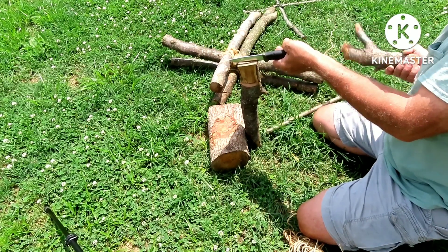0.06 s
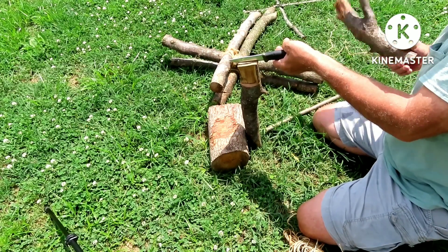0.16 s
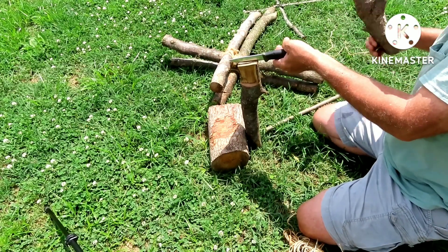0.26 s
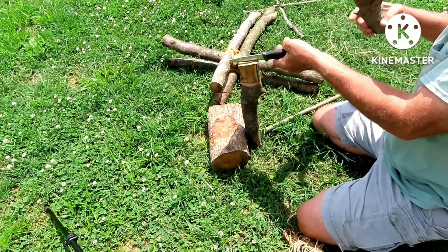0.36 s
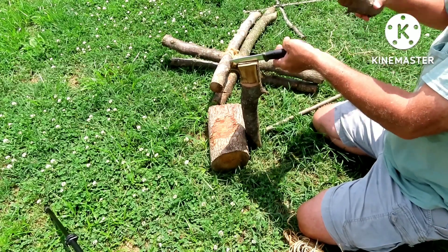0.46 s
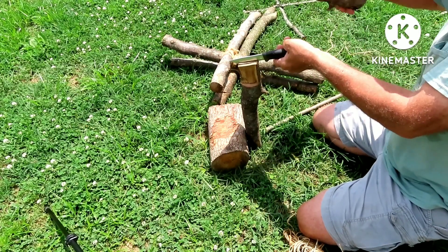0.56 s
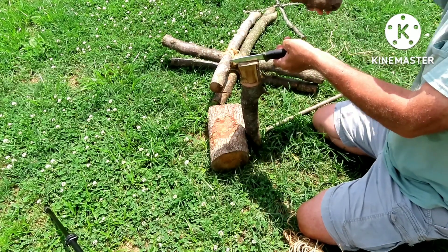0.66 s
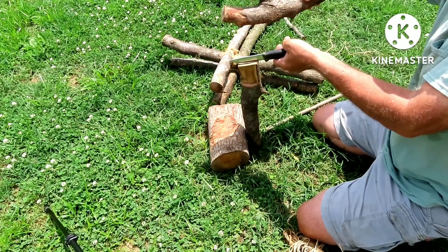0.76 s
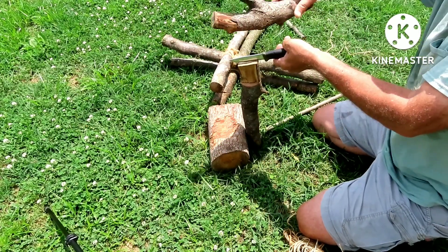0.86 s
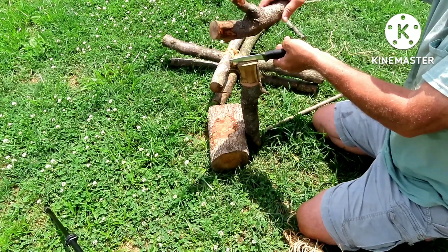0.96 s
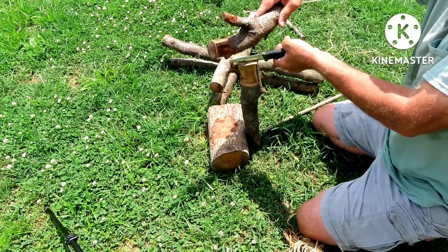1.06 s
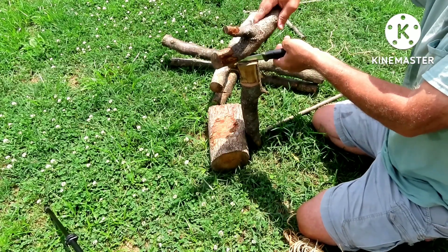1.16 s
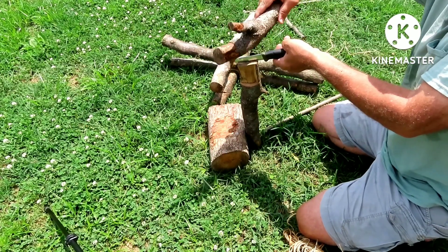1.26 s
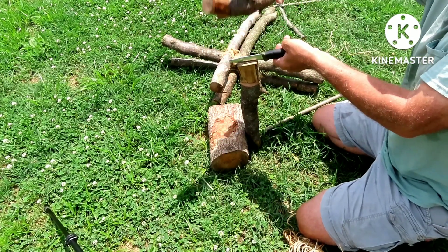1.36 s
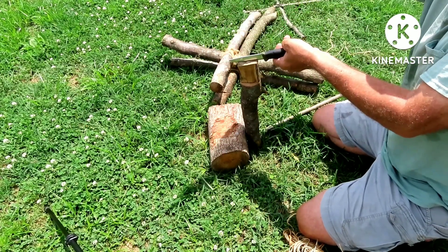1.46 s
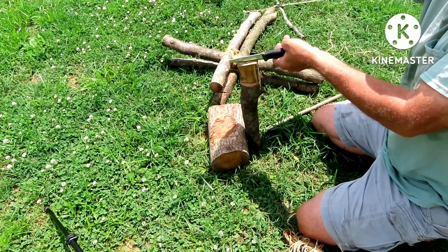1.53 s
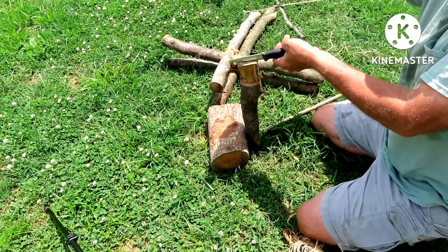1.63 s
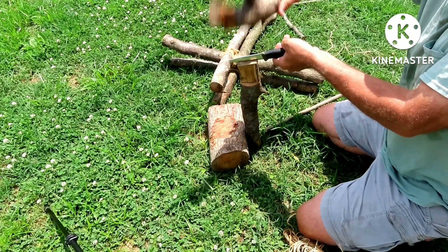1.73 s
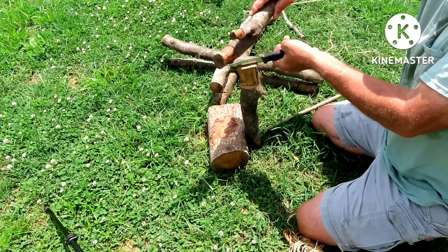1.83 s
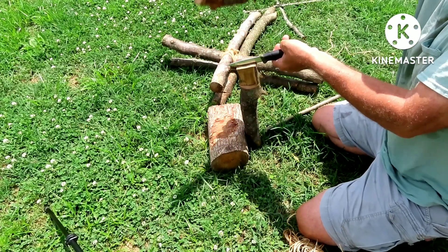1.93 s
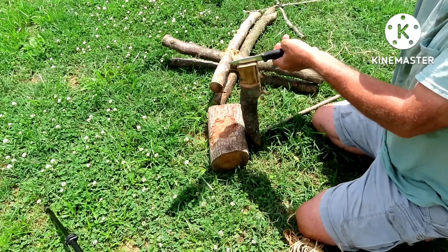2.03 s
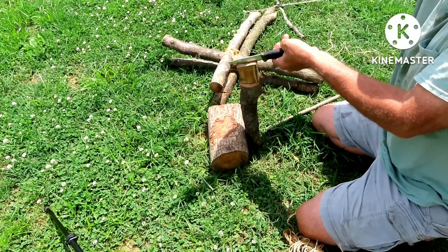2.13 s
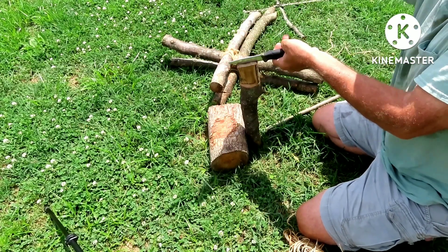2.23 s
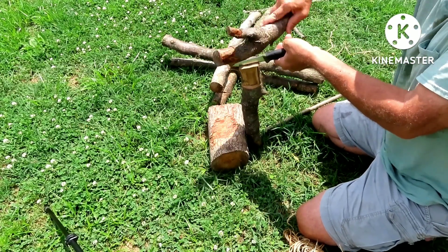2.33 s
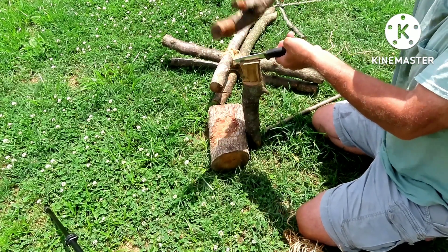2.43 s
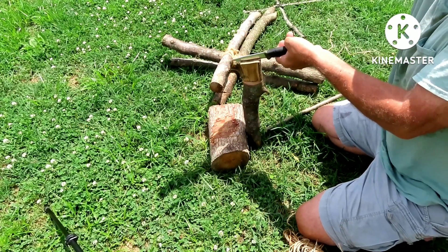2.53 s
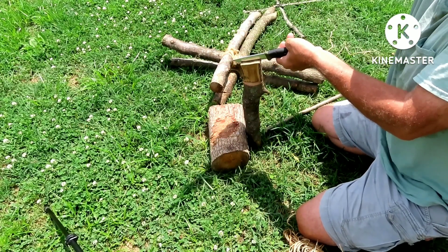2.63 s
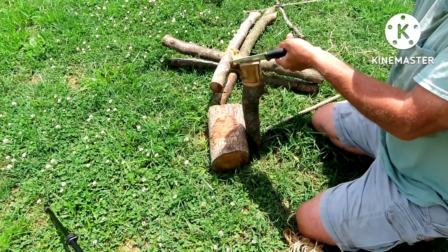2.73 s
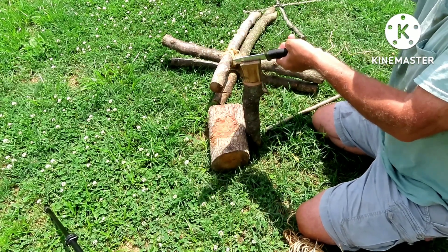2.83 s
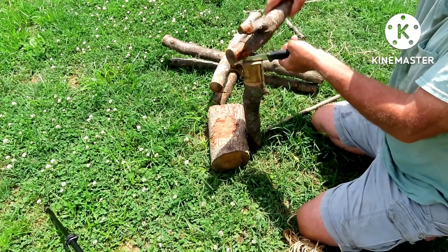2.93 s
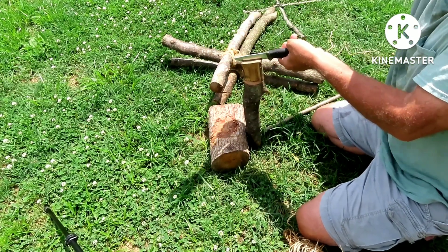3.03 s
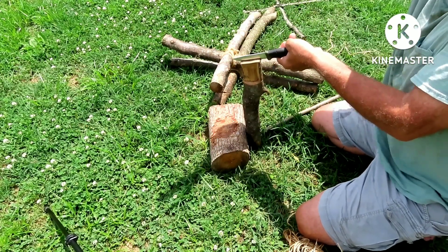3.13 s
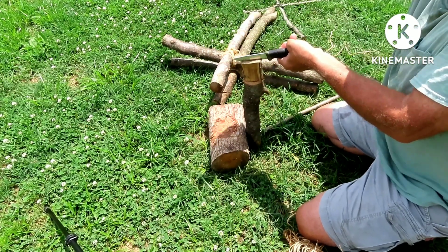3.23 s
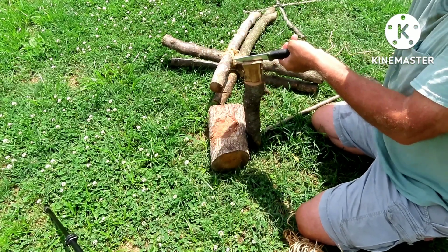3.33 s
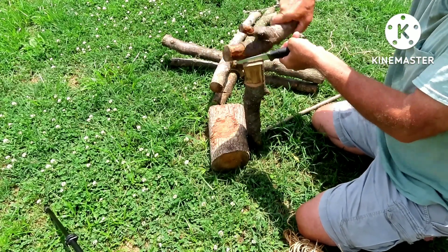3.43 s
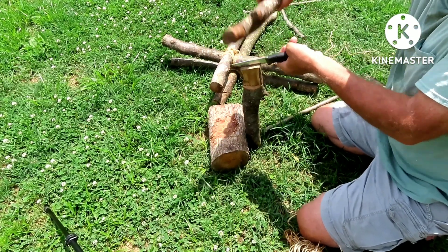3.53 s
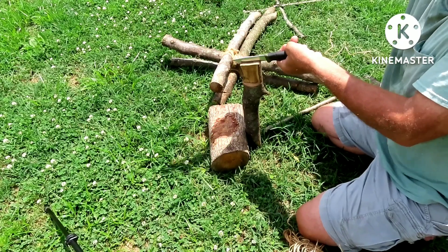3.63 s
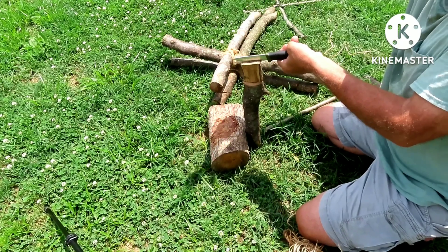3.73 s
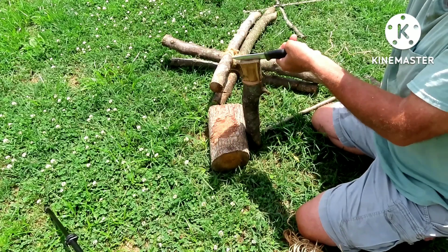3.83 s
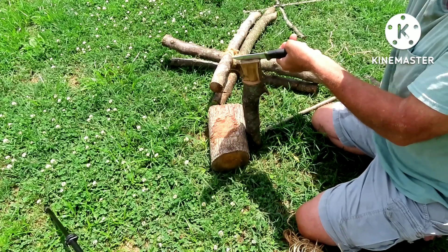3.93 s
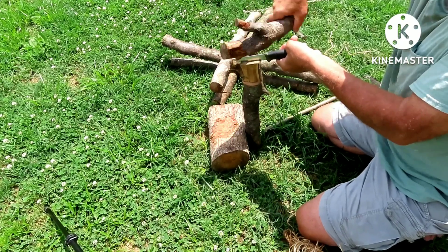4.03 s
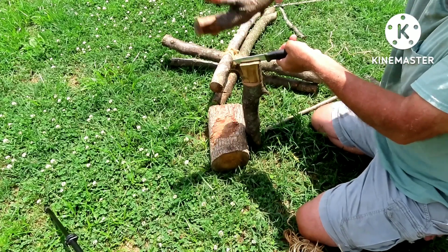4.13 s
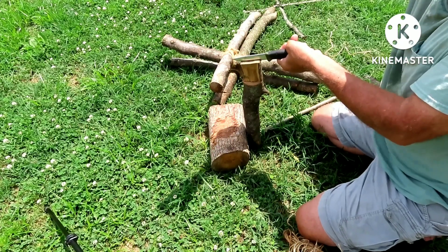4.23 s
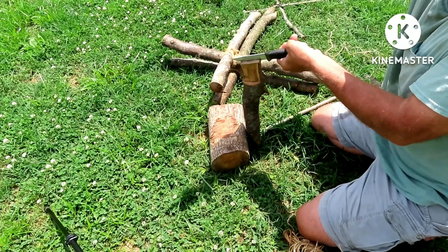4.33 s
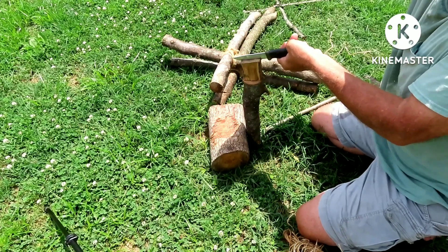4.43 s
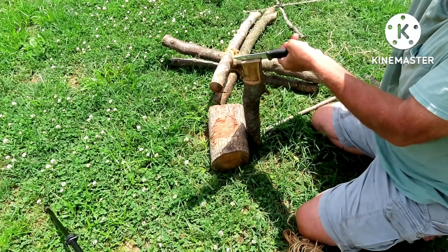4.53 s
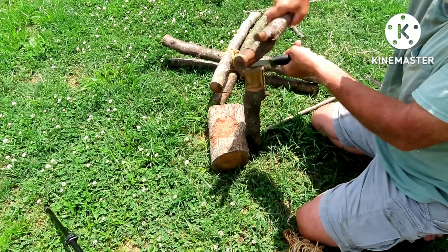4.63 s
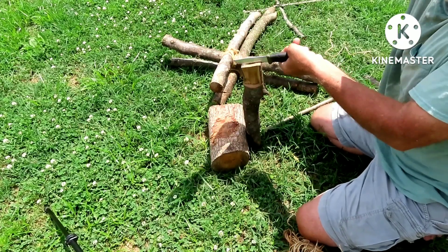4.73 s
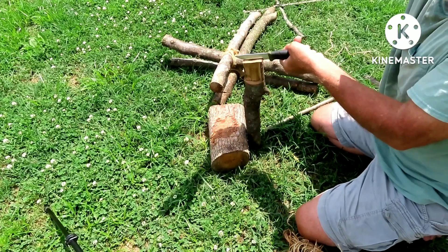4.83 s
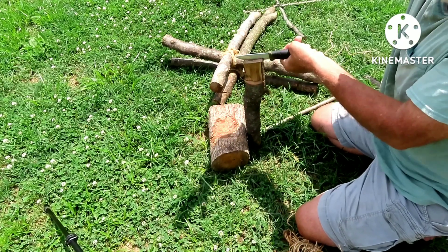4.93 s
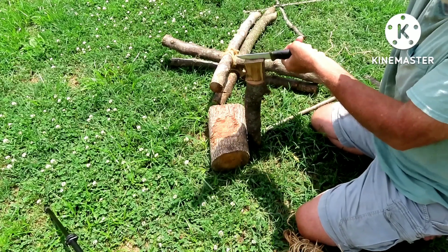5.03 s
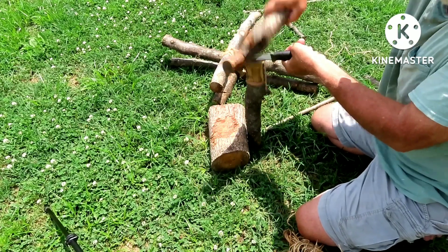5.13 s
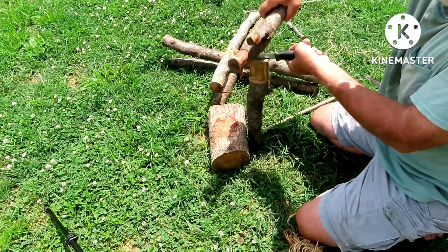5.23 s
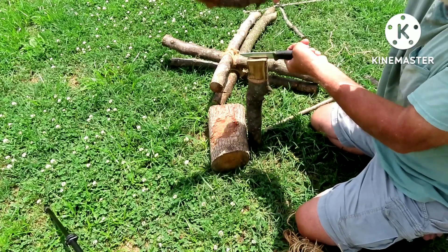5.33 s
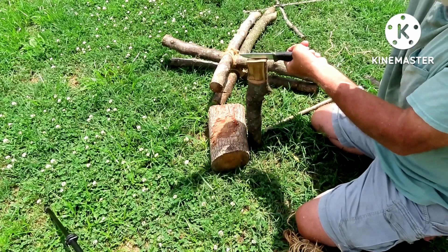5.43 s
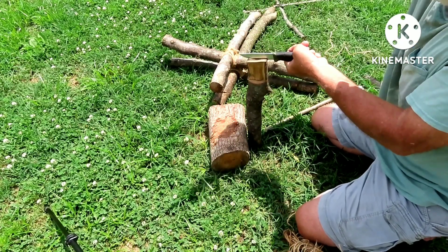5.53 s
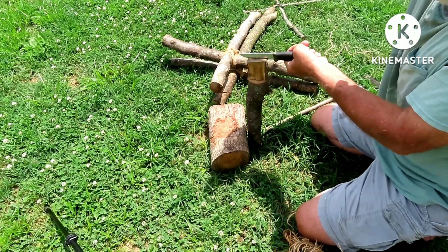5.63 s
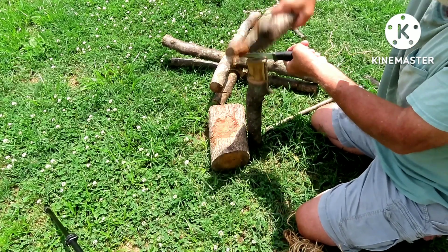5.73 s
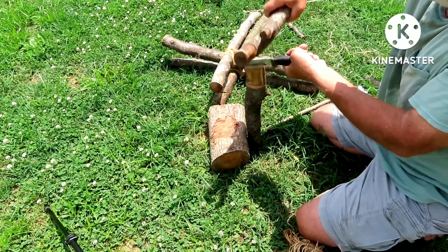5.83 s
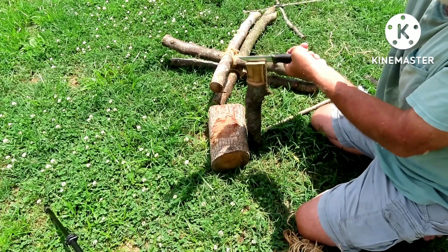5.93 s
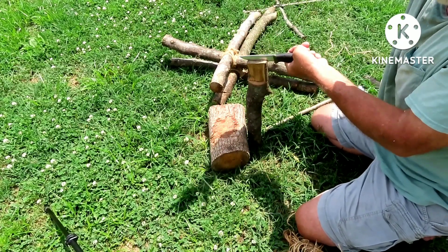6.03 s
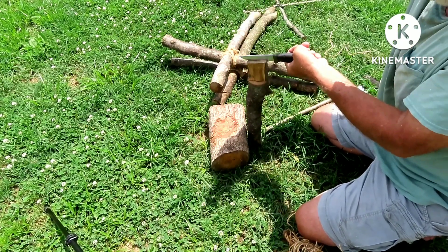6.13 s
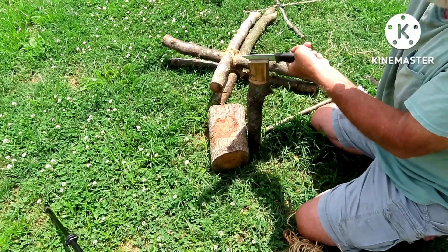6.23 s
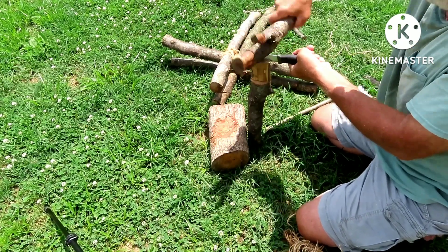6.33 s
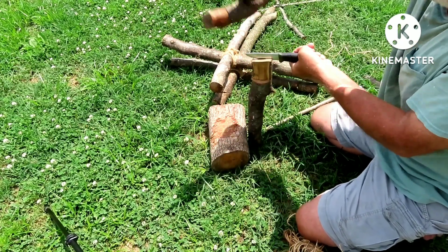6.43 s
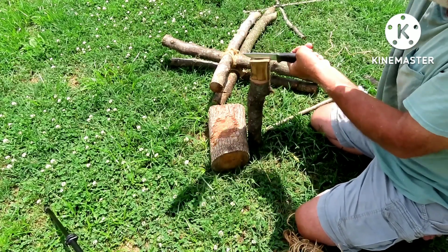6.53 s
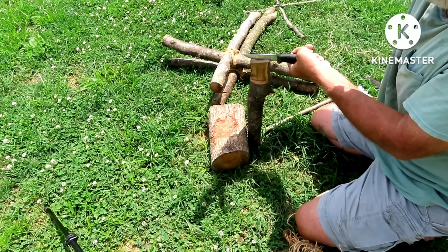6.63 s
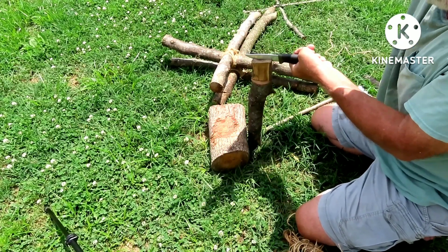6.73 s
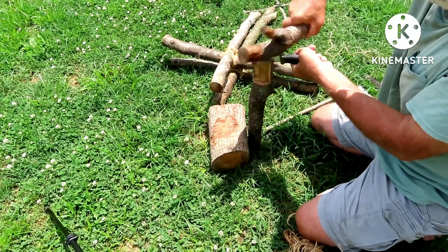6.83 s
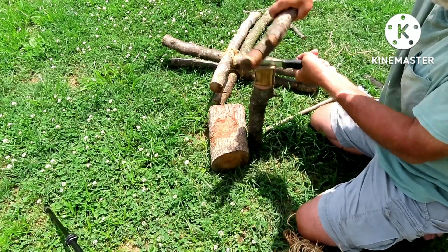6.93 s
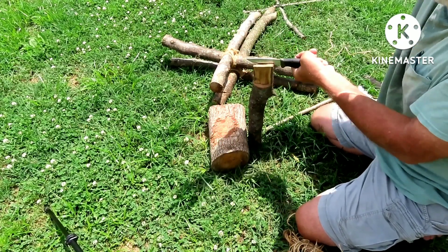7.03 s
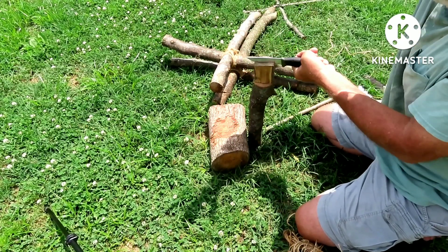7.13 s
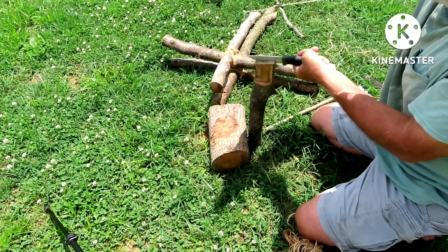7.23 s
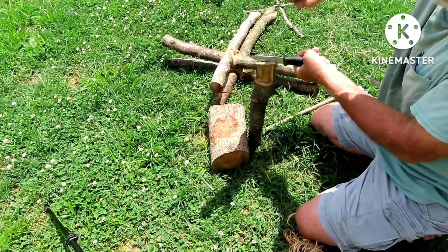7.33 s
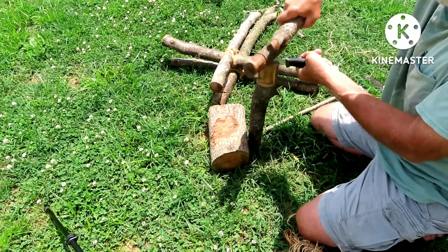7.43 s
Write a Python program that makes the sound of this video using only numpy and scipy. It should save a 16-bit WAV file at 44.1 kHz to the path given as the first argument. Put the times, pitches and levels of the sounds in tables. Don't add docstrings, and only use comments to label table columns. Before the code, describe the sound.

After light taps and a sleeve rustle, a stick clacks against a blade in a log about every half second, with garden echoes and distant traffic.

```python
import sys
import numpy as np
from scipy import signal
from scipy.fft import rfft, irfft
from scipy.io import wavfile
from scipy.ndimage import uniform_filter1d

SR = 44100
rng = np.random.default_rng(int(sys.argv[2]) if len(sys.argv) > 2 else 0)


def level_to_linear(level):
    exponent = np.asarray(level, float) / 20
    return 10 ** exponent


def to_wav(sig):
    pcm = np.clip(np.atleast_2d(sig), -1, 1) * 32767
    pcm = np.round(pcm).astype(np.int16)
    wavfile.write(sys.argv[1], SR, pcm.T)


N = 330309


def rms_one(x):
    return x / np.sqrt(np.mean(x ** 2) + 1e-20)


def in_time(rows):
    s, *columns = np.transpose(rows)
    return [np.interp(np.arange(N) / SR, s, c) for c in columns]


def at_hz(points, hz):
    point_hz, value = np.array(points)[:, :2].T
    return np.interp(np.log(hz), np.log(point_hz), value)


def bandpass(x, low_hz, high_hz, order=2):
    return signal.sosfilt(signal.butter(order, [low_hz, high_hz], "band", fs=SR, output="sos"), x)


def lowpass(x, top_hz, order=2):
    return signal.sosfilt(signal.butter(order, top_hz, fs=SR, output="sos"), x)


def drift(rate_hz):
    r = np.exp(-80 * np.pi * rate_hz / SR)
    slow = signal.lfilter([1], [1, -2 * r, r * r], rng.standard_normal(N // 40 + 2002))
    slow = slow[2000:]
    return np.interp(np.arange(N) / 40, np.arange(len(slow)), rms_one(slow))


# f/Hz, left-right correlation/1
LIKENESS = [(60, 0.99), (120, 1), (240, 0.72), (480, 0.49), (950, 0.96), (1890, 0.77), (3770, 0.51),
            (7520, 0.23), (15000, -1.4)]


def banded_noise(spectrum, low_hz, count, patchy_db):
    out, together = 0, drift(1.5)
    edges = low_hz * 2 ** (np.arange(count + 1) / 3)
    white = rng.standard_normal((2, 2, N))
    for k, (low, high) in enumerate(zip(edges, edges[1:])):
        mid, side = bandpass(white[k % 2], low, high)
        hz = np.sqrt(low * high)
        alike = np.clip(at_hz(LIKENESS, hz), -1, 1)
        gain = level_to_linear(at_hz(spectrum, hz) + patchy_db * (0.92 * together + drift(11.5)))
        out = out + gain * (np.sqrt(1 + alike) * mid + np.sqrt(1 - alike) * side * [[1], [-1]])
    return rms_one(out)


# t/s, level/dB
TRAFFIC = [(0.0, -42.5), (0.54, -45.5), (1.23, -43.5), (1.96, -46.5), (2.98, -44.5), (3.71, -45.5),
           (4.17, -43.5), (5.07, -46.5), (5.3, -44), (7.49, -45.5)]
# f/Hz, level/dB (per Hz)
RUMBLE = [(15, -42), (25, -12.5), (59, 1), (107, -2), (173, -8), (210, -4.5), (249, -12.5), (299, -10.5),
          (330, -14), (430, -45), (730, -120)]
# f/Hz, level/dB (per Hz)
ROAR = [(260, -6), (320, -1), (410, -8), (650, -9.5), (765, 0), (830, -10.5), (1310, -10.5), (2850, -23),
        (5000, -32.5), (7800, -39.5), (11000, -33.5)]


def traffic():
    roar_db, = in_time(TRAFFIC)
    mean_db = roar_db.mean()
    rumble_db = mean_db + 7 + 0.3 * (roar_db - mean_db)
    rumble = level_to_linear(rumble_db) * banded_noise(RUMBLE, 21.4, count=12, patchy_db=0.57)
    roar = level_to_linear(roar_db + 1.0) * banded_noise(ROAR, 356.5, count=15, patchy_db=0.87)
    return rumble + roar


def drone(rows, wobble_hz, flutter_db):
    hz, level_db = in_time(rows)
    phase = 2 * np.pi * np.cumsum(hz + wobble_hz * drift(5.07)) / SR
    return np.sqrt(2) * level_to_linear(level_db + flutter_db * drift(3.8)) * np.sin(phase)


# t/s, f/Hz, level/dB
LOW_DRONE = [(0.0, 91.8, -38.5), (0.75, 91.7, -38), (1.25, 91.7, -50), (1.42, 90, -39.5), (2.0, 90.65, -38),
             (2.65, 87.3, -33.5), (2.85, 87, -41), (3.42, 86.25, -36), (3.6, 87, -47), (3.75, 85.44, -41.5),
             (4.7, 77.5, -40.5), (5.3, 76.2, -48), (5.8, 77, -41.5), (6.3, 75, -44), (6.84, 77, -36),
             (7.08, 76.1, -60), (7.26, 75.8, -33.5), (7.49, 74.7, -33.5)]
# t/s, f/Hz, level/dB
HIGH_DRONE = [(0.0, 118, -45), (0.52, 123, -49), (0.81, 124, -37), (1.71, 125.8, -42), (2.1, 126, -53),
              (3.55, 114, -56), (3.8, 115.3, -38), (5.09, 127, -43.5), (5.38, 127.2, -50),
              (5.55, 128.4, -38), (5.83, 126, -38), (5.99, 128, -58), (6.24, 129.8, -36),
              (6.45, 127.8, -44), (6.61, 128.2, -31.5), (6.8, 128, -45), (7.26, 124, -37.5),
              (7.49, 113, -39)]


def engines():
    low = drone(LOW_DRONE, wobble_hz=2.184, flutter_db=2.0)
    high = drone(HIGH_DRONE, wobble_hz=1.456, flutter_db=0.0)
    return low + high


def far_crickets(level_db):
    band = bandpass(rng.standard_normal((2, N)), 9500, 10800)
    return level_to_linear(level_db + 4.6 * drift(11)) * rms_one(band[0] + .6 * band)


def air_hiss(level_db):
    band = bandpass(rng.standard_normal((2, N)), 10800, 15300, order=4)
    return level_to_linear(level_db + 0.83 * drift(9)) * rms_one(band)


# t/s, peak level/dB, f/Hz, t60/s
TICKS = [
    (0.013, -27.5, 640, 0.096),
    (.015, -28, 1200, 0.067),
    (.017, -34, 2190, 0.025),
    (.1565, -42, 6900, .008),
    (.158, -42, 11000, .008),
    (.386, -45, 11530, .03),
    (.91, -45, 5000, .07),
    (.915, -54, 11000, .05),
    (.9916, -43, 10520, 0.016),
    (1.318, -31, 1900, .04),
]


def ticks():
    out, t = np.zeros(N), np.arange(2000) / SR
    for s, peak_db, hz, t60 in TICKS:
        burst = rng.standard_normal(len(t)) * level_to_linear(-60 * t / t60)
        burst = bandpass(burst, hz / 1.48, hz * 1.06)
        out[round(s * SR):][:len(t)] += level_to_linear(peak_db) * burst / np.abs(burst).max()
    return out


# t/s, peak level/dB, swell and fade/(dB/s)
BRUSHES = [
    (.04, -61, 90),
    (.156, -51, 260),
    (.42, -67, 30),
    (.92, -61, 120),
    (.99, -61, 280),
]


def cloth():
    grains = rng.standard_normal((2, N)) * level_to_linear(2.2 * drift(60))
    bright = bandpass(grains[0] + .6 * grains, 3500, 12500)
    t = np.arange(N) / SR
    level = sum(level_to_linear(peak_db - slope * np.abs(t - s)) for s, peak_db, slope in BRUSHES)
    since_last = np.maximum(t - BRUSHES[-1][0] - .06, 0)
    return level_to_linear(-6.0 - 400 * since_last) * level * rms_one(bright)


def ring(clicks, hz, t60):
    r, w = level_to_linear(-60 / (t60 * SR)), 2 * np.pi * hz / SR
    return signal.lfilter([0, np.sin(w)], [1, -2 * r * np.cos(w), r * r], clicks + 1e-18)


def chirp_times(bouts, period_s):
    rows = []
    for first, last, db in bouts:
        count = round((last - first) / period_s) + 1
        rows += [(s, db) for s in np.linspace(first, last, count)]
    jitter_s, jitter_db = 0.0041, 1.0
    return np.array(rows) + rng.standard_normal((len(rows), 2)) * [jitter_s, jitter_db]


def cricket(chirps, modes, length_s, strokes_per_s, lag_samples, gain_db):
    t, gate = np.arange(N) / SR, np.zeros(N)
    for s, level_db in chirps:
        span = slice(max(round((s - length_s) * SR), 0), round((s + length_s) * SR))
        since = t[span] - s
        strokes = np.cos(np.pi * strokes_per_s * since) ** 2
        gate[span] += level_to_linear(level_db + gain_db) * strokes * np.exp(-(2 * since / length_s) ** 4)
    teeth = rng.standard_normal(N)
    wings = sum(level_to_linear(db) * rms_one(ring(teeth, hz, t60)) for hz, db, t60 in modes)
    voice = gate * rms_one(wings)
    return np.array([voice, np.interp(np.arange(N) - lag_samples, np.arange(N), voice)])


# first t/s, last t/s, level/dB
HIGH_CRICKET = [(.052, .052, -60), (.234, 1.85, -59), (2.006, 2.9, -63), (2.926, 3.523, -59),
                (3.702, 4.9, -62.5), (4.786, 5.27, -60), (5.453, 6.254, -64), (6.43, 6.797, -60),
                (6.96, 7.428, -62)]
# first t/s, last t/s, level/dB
LOW_CRICKET = [(.17, .17, -63), (.32, 1.14, -64), (1.3, 1.3, -64), (1.45, 2.35, -62.5), (2.73, 2.8, -67),
               (3.26, 3.1, -62.5), (4.05, 4.82, -65), (5.155, 5.3, -64), (6.05, 6.05, -73),
               (6.42, 6.91, -66), (7.15, 7.38, -67)]


def crickets():
    high = cricket(chirp_times(HIGH_CRICKET, period_s=.15), [(10550, 19, 0.022), (10100, -6, 0.0091)],
                   length_s=0.054, strokes_per_s=162, lag_samples=-1.6, gain_db=9.5)
    low = cricket(chirp_times(LOW_CRICKET, period_s=.113), [(9050, 0, 0.014)],
                  length_s=0.034, strokes_per_s=136, lag_samples=1.86, gain_db=11)
    return high + low


RISE_S = 0.0023

# t/s, then level/dB of log thud, baton knock, blade clack, bright crack
BLOWS = [
    (1.913, -15.5, -13, -3.5, -19.5),
    (2.476, -10.5, -15, -3, -17),
    (3.032, -8.5, -12, -1.5, -16),
    (3.576, -8, -16, -7, -19),
    (4.161, -12, -9, -4, -14.5),
    (4.732, -8, -7, -12, -20.5),
    (5.301, -15, -8.5, -1.5, -19.5),
    (5.901, -12, -12, -3, -19),
    (6.447, -9.5, -10, -12, -41.5),
    (6.99, -12.5, -7, -10, -17.5),
]
# soil thump level/dB, favoured log f/Hz, favoured blade f/Hz, baton f/Hz
LANDINGS = [(-20, 550, 2340, 1280), (-35, 834, 3030, 1417), (-31, 880, 1600, 1377), (-19, 920, 3100, 1196),
            (-19, 659, 3430, 1374), (-26, 470, 3200, 1364), (-13, 580, 3590, 1378), (-25, 670, 3150, 1390),
            (-12, 640, 1952, 1398), (-37, 490, 3100, 1378)]
# f/Hz, level/dB, t60/s
LOG = [(482, -0.5, 0.02), (649, -2.5, 0.021), (749, 1.5, 0.022), (967, -4, 0.026)]
# f/(baton pitch, which shifts with the grip), level/dB, t60/s
BATON = [(1.025, 0, 0.029), (0.877, -12, 0.038), (1.277, -4.5, 0.019)]
# f/Hz, level/dB, t60/s
BLADE = [(1988, -1.5, 0.012), (2490, 2, 0.01), (2610, 3.5, 0.011), (3035, -0.5, 0.0083),
         (3546, -1.5, 0.012)]
# f/Hz, level/dB, t60/s
CRACK = [(4440, -1.5, 0.0081), (6170, 8, 0.0019), (8640, -5, 0.0019), (10700, 3, 0.0018),
         (13050, -11, 0.0059), (14900, -5, 0.00086)]
# f/Hz, level/dB, t60/s
SOIL = [(170, -12, 0.025), (234, -2.5, 0.013), (309, -2, 0.0086)]


def strike(modes, level_db, favoured_hz, t):
    hz, mode_db, t60 = np.transpose(modes)
    level_turn, pitch_turn = rng.standard_normal((2, len(hz)))
    if favoured_hz:
        mode_db = mode_db - 8.3 * np.abs(np.log2(hz / favoured_hz))
    sign = (-1) ** np.arange(len(hz))
    gain = level_to_linear(level_db + mode_db + 1.84 * level_turn - 60 * t / t60) * sign
    return (gain * np.sin(2 * np.pi * hz * (1 + 0.017 * pitch_turn) * t)).sum(axis=1)


def knocks():
    out, t = np.zeros(N), np.arange(4000)[:, None] / SR
    for (s, log_db, baton_db, blade_db, crack_db), landing in zip(BLOWS, LANDINGS):
        soil_db, log_hz, blade_hz, baton_hz = landing
        blow = strike(LOG, log_db + 10.5, log_hz, t)
        blow += strike(np.array(BATON) * [baton_hz, 1, 1], baton_db + 8.74, None, t)
        blow += strike(BLADE, blade_db + 7.5, blade_hz, t)
        blow += strike(CRACK, crack_db + 9.6, None, t)
        blow += strike(SOIL, soil_db + 3.5, None, t)
        contact_s = .0001 + .00003 * level_to_linear(-31 - crack_db)
        out[round((s + RISE_S) * SR):][:len(t)] += blow * (1 - np.exp(-t[:, 0] / contact_s))
    grass = lowpass(out, 6000)
    ground_s, ground_db = .0028, -14
    return out - level_to_linear(ground_db) * np.roll(grass, round(ground_s * SR))


# delay t/s, level/dB, left-right level/dB
SLAPS = [(.0095, -23, 9), (0.0238, -26.5, -7.5), (.032, -26.5, -5)]


def slaps(blows):
    dull = bandpass(blows, 900, 3400, order=4)
    out = 0
    for s, db, pan_db in SLAPS:
        sides_db = db + pan_db * np.array([[.5], [-.5]])
        out = out + level_to_linear(sides_db) * np.roll(dull, round(s * SR))
    return out


# delay t/s, level/dB, smear t/s
ECHOES = [(.012, -26, 0.0021), (0.022, -28.5, 0.0092), (0.033, -30.5, 0.0038), (0.051, -35.5, 0.0051),
          (0.068, -35.5, 0.0072), (.113, -44.5, .005), (.205, -50, 0.0035), (.231, -46.5, 0.0052)]
# f/Hz, level/dB (per Hz)
SCATTER = [(300, -7.5), (500, -0.5), (1000, -5.5), (1200, -0.5), (1370, -2), (1600, -1.5), (2000, -2),
           (2720, -5.5), (2880, 1.5), (3040, -6), (5000, -19.5), (9000, -37.5), (12000, -65)]
# f/Hz, returned per struck level/(dB/dB)
RETURN_FOLLOWS = [(696, -0.26), (1370, 1), (2880, 1.75), (5000, 0.7)]


def garden():
    size = 2 ** 15
    t, out = np.arange(size) / SR, np.zeros((2, N))
    hz = np.maximum(np.arange(size // 2 + 1) * SR / size, 1)
    part_hz, follows = np.transpose(RETURN_FOLLOWS)
    struck_db = np.array(BLOWS)[:, 1:]
    returned_db = follows * (struck_db - np.median(struck_db, axis=0))
    wash_db, wash_t60_s = -40.5, 0.92
    for (s, *_), shares_db in zip(BLOWS, returned_db):
        power = level_to_linear(wash_db - 60 * t / wash_t60_s) ** 2 * np.clip(t / 0.022, 0, 1)
        for delay, level_db, smear in ECHOES:
            level_db = level_db + 1.5 * rng.standard_normal()
            power = power + level_to_linear(level_db) ** 2 * np.exp(-((t - delay) / smear) ** 2)
        colour_db = at_hz(SCATTER, hz) + at_hz(np.transpose([part_hz, shares_db]), hz)
        shared, *own = irfft(rfft(rng.standard_normal((3, size))) * level_to_linear(colour_db), size)
        wash = level_to_linear(0.44) * np.sqrt(power) * rms_one(shared + 0.3 * np.array(own))
        piece = out[:, round((s + RISE_S) * SR):][:, :size]
        piece += wash[:, :piece.shape[1]]
    return out


def scene():
    far = traffic() + engines() + crickets() + far_crickets(-72.0) + garden()
    far = signal.sosfilt(signal.cheby2(10, 40, 11770, fs=SR, output="sos"), far)
    blows = knocks()
    late = np.interp(np.arange(N) - .45, np.arange(N), blows)
    direct = np.array([level_to_linear(-0.37) * late, blows])
    return direct + slaps(blows) + far + air_hiss(-76.0) + ticks() + cloth()


def gain_control(x, threshold_db, ratio, release_db_per_s, attack_s):
    level_db = 20 * np.log10(np.abs(x).max(axis=0) + 1e-9)
    climb = release_db_per_s * np.arange(N) / SR
    held_db = np.maximum.accumulate(level_db + climb) - climb
    over_db = np.maximum(held_db - threshold_db, 0)
    r = np.exp(-1 / (attack_s * SR))
    return x * level_to_linear(-ratio * signal.lfilter([1 - r], [1, -r], over_db))


def swell_and_gate(x, smear_db, smear_s, gate_hz):
    window = np.hanning(round(2 * smear_s * SR))
    power = signal.fftconvolve(np.mean(x ** 2, axis=0), window / window.sum(), "same")
    loud = np.roll(np.sqrt(np.maximum(power, 0)), -len(window) // 3)
    grit = bandpass(rng.standard_normal(x.shape), 1300, 4500)
    smeared = x + level_to_linear(smear_db) * loud ** 1.54 * rms_one(grit)
    hz, _, cells = signal.stft(smeared, SR, nperseg=1024)
    power = uniform_filter1d(np.mean(np.abs(cells) ** 2, axis=0), size=7, axis=0)
    power = uniform_filter1d(power, size=3, axis=1)
    chirp = power[(hz > 10300) & (hz < 10900)].mean(axis=0)
    power = power / np.clip(chirp / np.median(chirp), .5, 4) ** .5
    top_peak = power.max(axis=0, where=hz[:, None] > gate_hz, initial=0)
    peak = uniform_filter1d(1. * (top_peak > 1e-7), size=3) > 0
    gate = np.quantile(power[(hz > gate_hz) & (hz < 15300)], .54)
    keep = (power > gate) | (hz[:, None] < gate_hz) | peak
    return signal.istft(cells * keep, SR, nperseg=1024)[1][:, :N]


def starve_top(x, top_hz, from_s, to_s):
    over = np.cumsum(np.abs(x).max(axis=0) > .95)
    starved = 1. * (np.roll(over, round(from_s * SR)) - np.roll(over, round(to_s * SR)) > 0)
    starved[:round(to_s * SR)] = 0
    dull = signal.sosfiltfilt(signal.butter(4, top_hz, fs=SR, output="sos"), x)
    return x + uniform_filter1d(starved, size=90) * (dull - x)


def roll_off(x):
    return signal.sosfilt(signal.butter(12, 16490, fs=SR, output="sos"), x)


def record(dry):
    held = gain_control(dry, threshold_db=-10, ratio=0.65, release_db_per_s=200, attack_s=0.017)
    gated = swell_and_gate(np.clip(held, -1, 1), smear_db=-23, smear_s=0.0064, gate_hz=11000)
    mix = starve_top(np.clip(gated, -1, 1), top_hz=7500, from_s=0.0079, to_s=0.03)
    return roll_off(mix)


dry = scene()
out = record(dry)
to_wav(out)
```